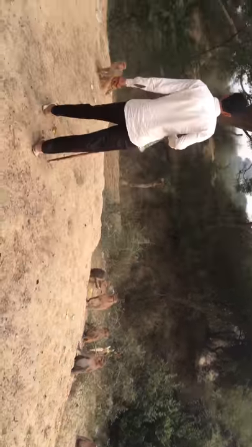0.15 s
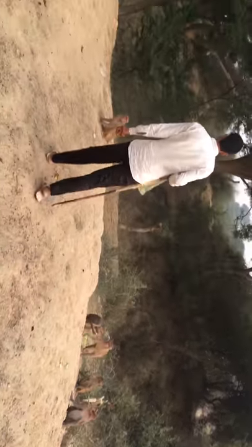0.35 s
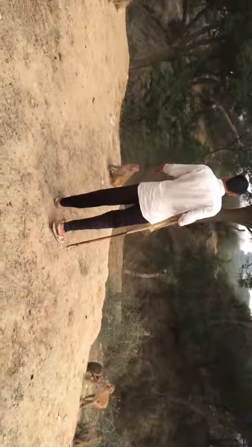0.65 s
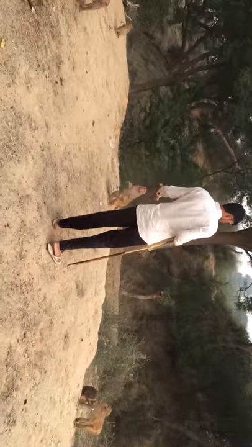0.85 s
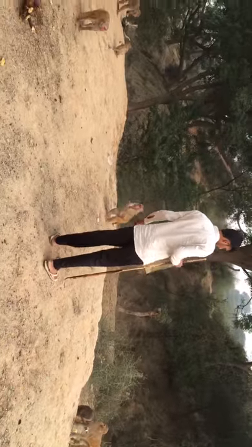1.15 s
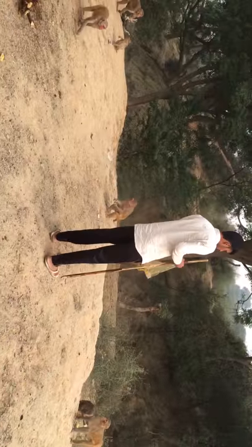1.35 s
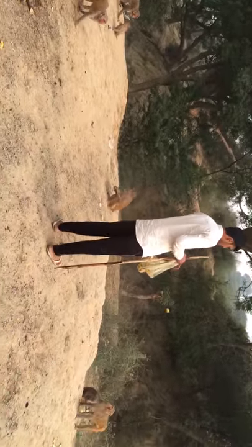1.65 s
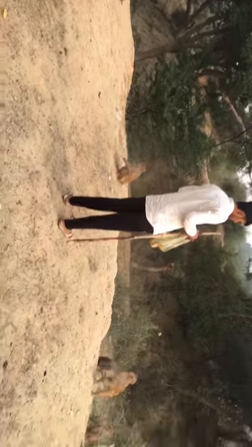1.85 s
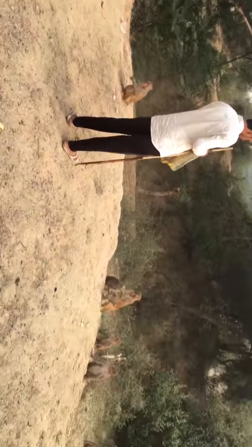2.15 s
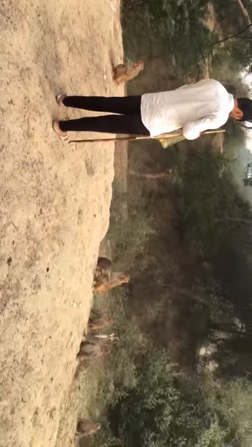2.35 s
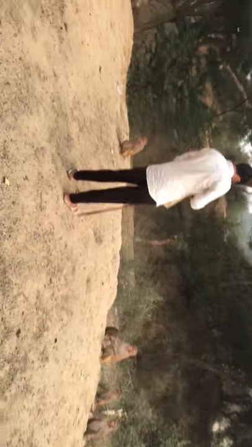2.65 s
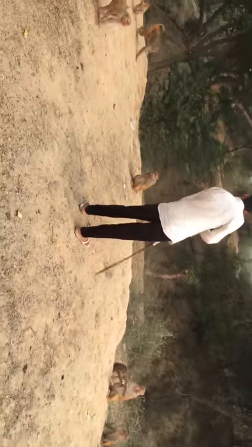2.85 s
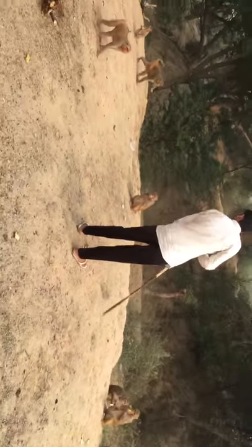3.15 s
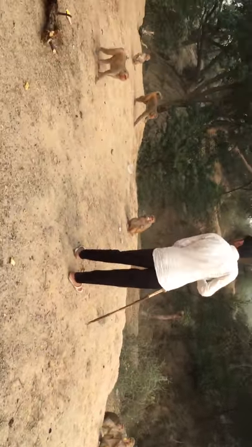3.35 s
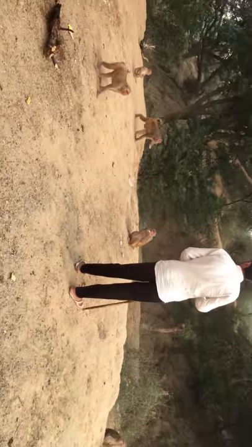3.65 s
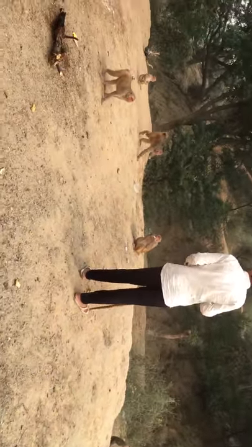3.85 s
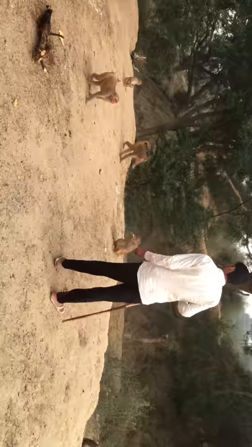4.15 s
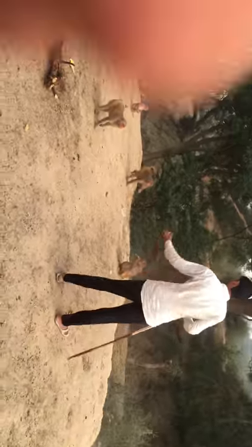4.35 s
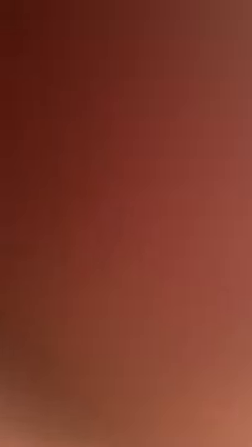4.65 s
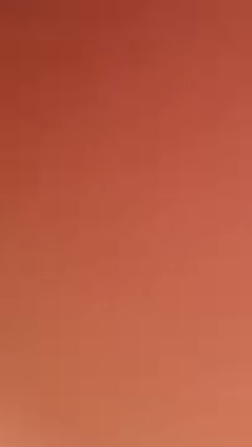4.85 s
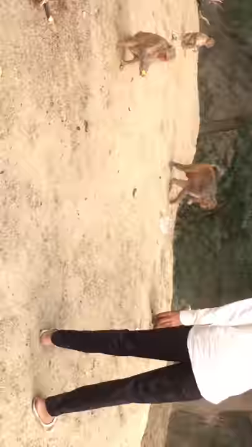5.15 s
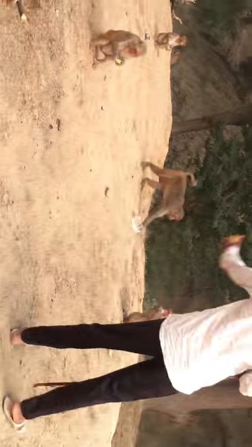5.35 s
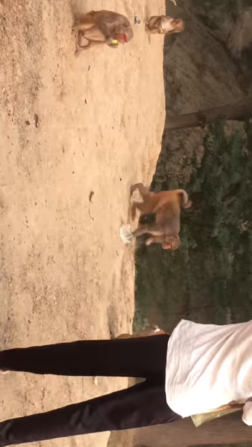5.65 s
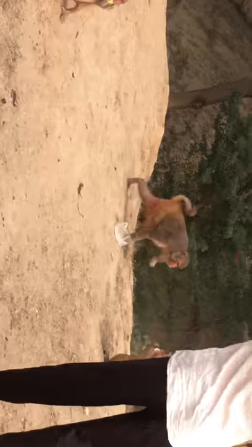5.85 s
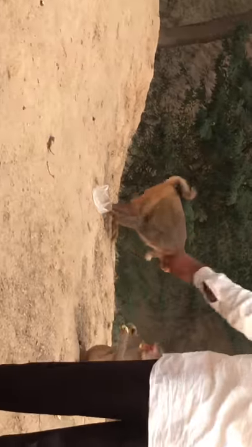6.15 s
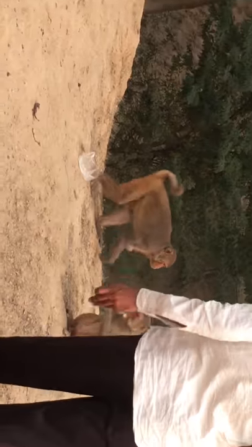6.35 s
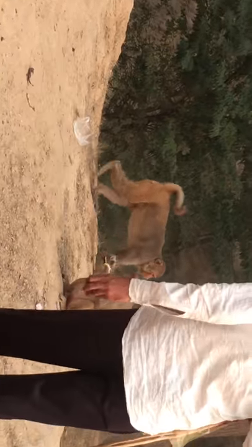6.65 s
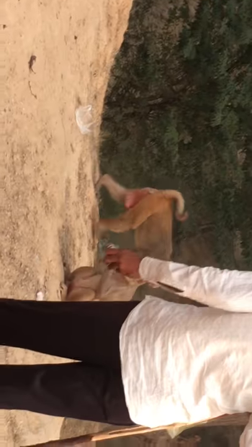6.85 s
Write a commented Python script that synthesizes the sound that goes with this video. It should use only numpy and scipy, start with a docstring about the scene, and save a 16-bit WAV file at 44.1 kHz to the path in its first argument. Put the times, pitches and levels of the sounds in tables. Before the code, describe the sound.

Monkeys coo, chirp, grunt and scream beside trees, with bag rustles and gritty ticks nearby and one low thump against the microphone late on.

```python
"""A troop of monkeys calls beside trees, over an airy hush and a low far rumble that run throughout.
Feet and a bag rustle and tick from the start, made of grainy noise and short rings, among soft gliding coos.
From 1.6 s hoarse screeches, low grunts and falling chirps join in, then four shrill screams from 2.5 s on.
Late, fingers tap the microphone case and a hand bumps it at 5.4 s. The calls are summed overtones plus
torn breath noise; calls, rustles and ticks echo faintly from the trees."""
import sys
import numpy as np
from scipy import signal
from scipy.fft import rfft, irfft
from scipy.io import wavfile
from scipy.ndimage import uniform_filter1d

SR = 44100
rng = np.random.default_rng(int(sys.argv[2]) if len(sys.argv) > 2 else 0)


def digitize_waveform(pressure):
    """Quantize a signal to 16-bit integers and store it at the path in sys.argv[1].

    Rows of a 2-D input are taken as channels; values are limited to [-1, 1].
    """
    field = np.atleast_2d(pressure).T
    bounded = np.clip(field, -1, 1)
    quanta = np.round(bounded * 32767).astype(np.int16)
    wavfile.write(sys.argv[1], SR, quanta)


N = 308170


def gain_of(db):
    """Amplitude factor of a level in dB."""
    return 10 ** (np.asarray(db) / 20)


def evened(x):
    """Scales a sound to an RMS of 1."""
    return x / np.sqrt(np.mean(x ** 2) + 1e-20)


def read(points, hz):
    """Reads a curve of (Hz, value) points on a logarithmic frequency axis."""
    f, value = np.transpose(points)
    return np.interp(np.log(hz + 1), np.log(f + 1), value)


def add(mix, s, sound):
    """Lays a sound into the mix at s seconds, trimming what falls outside."""
    sound = sound[max(-round(s * SR), 0):]
    part = mix[max(round(s * SR), 0):][:len(sound)]
    part += sound[:len(part)]


def coloured(x, db_at):
    """Filters x by a gain in dB given as a function of frequency."""
    hz = np.fft.rfftfreq(len(x), 1 / SR)
    return irfft(rfft(x) * gain_of(db_at(hz)), len(x))


def wander(count, s):
    """Slow chance with an RMS of 1 that changes about every s seconds."""
    size = max(round(s * SR), 1)
    noise = rng.standard_normal(count)
    return evened(uniform_filter1d(uniform_filter1d(noise, size), size))


# Spectrum shared by the hush and the rumble. Each row: frequency in Hz, relative density in dB per Hz.
AIR_COLOUR = [(15, -52), (25, -2.5), (43, -0.5), (64, -3.5), (130, -10), (223, -25.5), (531, -32.5),
              (1040, -32.5), (1330, -31.5), (3430, -38.5), (4870, -42.5), (6050, -41), (10400, -45),
              (12200, -47), (16000, -52)]
# Swells of the far rumble. Each row: time in seconds, level in dB.
RUMBLE_SWELLS = [(0, -46.5), (1.4, -50), (3, -49.5), (4.1, -49), (4.6, -50.5), (5.1, -48.5), (5.45, -43.5),
                 (5.75, -52), (6.1, -44), (6.5, -44.5), (6.99, -45.5)]
HUSH_DB = -62.5


def air():
    """Outdoor hush; below it a far rumble swells around one wavering low tone."""
    t = np.arange(N) / SR
    without_bass = lambda f: read(AIR_COLOUR, f) - 20 / (1 + (f / 100) ** 4)
    only_bass = lambda f: read(AIR_COLOUR, f) - 40 / (1 + (160 / (f + 1)) ** 6)
    hush = gain_of(HUSH_DB) * evened(coloured(rng.standard_normal(N), without_bass))
    hush = hush * gain_of(wander(N, .1))

    roar = evened(coloured(rng.standard_normal(N), only_bass))
    hum_hz = 49 * (1 + .08 * wander(N, .05))
    hum = np.sin(2 * np.pi * np.cumsum(hum_hz) / SR) * gain_of(.52 * wander(N, .043))
    rumble = evened(roar + gain_of(-2) * evened(hum))
    return hush + rumble * gain_of(np.interp(t, *np.transpose(RUMBLE_SWELLS)))


# Rustles of feet and bag. Each row: start in seconds, length in seconds, level in dB, centre in Hz,
# fall below the centre in dB per octave, fall above it in dB per octave.
RUSTLES = [(-.05, 0.19, -55.5, 3980, 0, 1.6), (0.092, .22, -58, 3120, 4, 8.5),
           (0.6, 0.059, -56.5, 3380, 9, 7.7), (0.731, 0.06, -46.5, 2400, 12, 8.2),
           (1.113, 0.016, -57, 2000, 10, 5), (1.641, 0.047, -55.5, 2500, 2.5, 18),
           (1.906, .11, -61, 1500, 21, 8), (1.978, .16, -56.5, 2270, 6, 13.4),
           (2.119, 0.18, -62.5, 7900, 0, 4.7), (2.239, 0.16, -57, 1950, 1, 6.4),
           (2.421, 0.1, -63.5, 2500, 3, 7.5), (2.831, 0.27, -51.5, 1630, 12, 13),
           (3.074, .16, -51.5, 1670, 6.5, 12.2), (3.79, 0.2, -53, 1370, 0.5, 8.6),
           (4.356, .039, -45.5, 2540, 3, 9.5), (4.506, 0.043, -51.5, 903, 0, 6.5),
           (4.577, .066, -51.5, 2650, 4, 11), (4.987, 0.046, -52, 200, 4, 13),
           (5.057, .13, -48, 200, 5, 5.8), (5.604, 0.21, -61, 3760, 2, 13),
           (5.9, 0.11, -60.5, 1210, 21, 12), (6.675, 0.026, -56.5, 3030, 12, 13)]


def rustles():
    """Clumped crackle: noise in uneven grains around a broad peak."""
    out = np.zeros(N)
    for s, length, db, hz, below_db, above_db in RUSTLES:
        count = round(length * SR)
        fine, clumps = 2.47 * wander(count, .00066), 2.84 * wander(count, .02)  # dB
        grains = rng.standard_normal(count) * gain_of(fine + clumps)
        octaves = lambda f: np.log2((f + 30) / hz)
        sound = coloured(grains, lambda f: np.minimum(below_db * octaves(f), -above_db * octaves(f)))
        add(out, s, gain_of(db) * evened(sound) * signal.windows.tukey(count, .4))
    return out


def torn(x, patchy_db):
    """Breaks noise into short narrow streaks, as folds that catch a pitch for a moment."""
    z = signal.stft(x, nperseg=256, noverlap=192)[2]
    patches = rng.standard_normal(z.shape)
    patches = uniform_filter1d(patches, 2, 0)  # narrow in frequency
    patches = uniform_filter1d(patches, 14, 1)  # drawn out in time
    streaks = z * gain_of(patchy_db * evened(patches))
    return evened(signal.istft(streaks, nperseg=256, noverlap=192)[1][:len(x)])


def call(rows, mouth, rasp, jitter, shimmer_db, breath_db, half_db):
    """Overtones of vocal folds and half lines shaped by the mouth, plus breath; hoarseness unsettles them."""
    # rows of controls: time s, pitch Hz, level dB, overtone tilt dB per octave, hoarseness 0-1
    s, *columns = np.transpose(rows)
    t = np.arange(s[0], s[-1], 1 / SR)
    hz, level_db, tilt_db, hoarse = (np.interp(t, s, c) for c in columns)
    hoarse = np.clip(hoarse, .02, .98)
    shake = wander(len(t), .00122) + 1.135 * wander(len(t), .00758)
    hz = hz * (1 + jitter * hoarse * shake)

    order = np.arange(1, 21)[:, None] / 2
    half = gain_of(half_db) * hoarse ** 2  # hoarse folds skip every other cycle
    size = gain_of(read(mouth, order * hz) + tilt_db * np.log2(order))
    size = size * np.where(order % 1 > 0, half, 1)
    size = size * (order * hz < 16000)
    size = size / np.sqrt((size ** 2).sum(0) / 2)  # steady power whatever the pitch

    flutter = np.array([wander(len(t), .029) for _ in order])  # each overtone comes and goes by itself
    flutter_db = 2.2 * np.log2(1 + order) * np.sqrt(hoarse) * flutter
    size = size * gain_of(flutter_db - 2 * hoarse * order)  # hoarseness also weakens the high overtones
    tone = (size * np.sin(2 * np.pi * order * np.cumsum(hz) / SR)).sum(0)
    tone = tone * gain_of(shimmer_db * np.sqrt(hoarse) * wander(len(t), .0036))

    breath = coloured(rng.standard_normal(len(t)), lambda f: read(rasp, f))
    breath = torn(breath, patchy_db=6)
    breath = breath * gain_of(2.3 * wander(len(t), .012))  # coarse bursts
    sound = np.sqrt(1 - hoarse ** 2) * tone + gain_of(breath_db) * hoarse ** 2 * breath
    fades = signal.windows.tukey(len(t), min(.026 / (s[-1] - s[0]), 1))  # 13 ms at each end
    return s[0], gain_of(level_db) * sound * fades


# Coos bend smoothly in pitch. Each row: start in seconds, length in seconds, start pitch in Hz, turning pitch
# in Hz, end pitch in Hz, level in dB, change by the end in dB, tilt of the overtones at the start and
# at the end in dB per octave.
COOS = [(0, .26, 715, 710, 740, -49, -9, -28, -26), (.23, .105, 1335, 1260, 1165, -60, -2, -1.5, -1.5),
        (.53, .07, 1375, 1310, 1240, -70, 0, -8, -8), (.722, .243, 518, 547, 505, -42, -16, -30, -9),
        (1.055, .615, 870, 1000, 865, -55, -2, -26, -16), (2.42, .06, 1270, 1230, 1190, -62, -6, -7, -7),
        (2.63, .23, 840, 778, 805, -65, 2, -10, -10), (3.97, .23, 1535, 1530, 1490, -59, -6, -16, -18),
        (5.81, .09, 1400, 1340, 1270, -52, -10, -15, -18)]
# How a coo leaves the mouth. Each row: frequency in Hz, gain in dB.
COO_MOUTH = [(500, 0), (1000, -3), (1500, -3), (2200, 6), (3000, 13), (3700, 15), (4400, 10), (6000, 8),
             (7500, 5), (9000, 17), (10500, 0), (14000, 0)]
# Colour of the breath in coos, screeches and chirps. Each row: frequency in Hz, gain in dB.
CALL_RASP = [(700, -21), (1500, -7), (2600, -2), (3300, 6), (4400, 0), (5200, -8), (6500, -9.5),
             (9200, -15), (10500, -18.5), (15000, -47)]
COO_TURN_AT, COO_SWELL_DB, COO_HOARSE = .46, -4, .14  # share of length; soft start; 0-1


def coo(s, length, start_hz, turn_hz, end_hz, db, fade_db, tilt_db, end_tilt_db):
    """Controls of a coo: pitch bends over, level swells in and then drifts, the overtone tilt glides."""
    u = np.linspace(0, 1, num=24)
    side = np.interp(u, [0, COO_TURN_AT, 1], [-1, 0, 1])
    hz = turn_hz + (np.where(side < 0, start_hz, end_hz) - turn_hz) * side ** 2
    soft_start_db = COO_SWELL_DB * (1 - u) ** 3 * (s > 0)  # a coo at time 0 is already under way
    level_db = db + soft_start_db + fade_db * u ** 2
    tilt = tilt_db + (end_tilt_db - tilt_db) * u
    return np.transpose([s + u * length, hz, level_db, tilt, COO_HOARSE + 0 * u])


def coos():
    """Soft, nearly clear voices with little breath."""
    out = np.zeros(N)
    for row in COOS:
        add(out, *call(coo(*row), COO_MOUTH, CALL_RASP, jitter=.015, shimmer_db=5, breath_db=-30, half_db=-32))
    return out


def knocks(rows, cycles, share, share_per_db):
    """Each knock is a quickly dying ring with a short crack of noise on top."""
    out, t = np.zeros(N), np.arange(900) / SR
    for s, db, hz in rows:
        ring = np.sin(2 * np.pi * hz * t) * np.exp(-hz * t / (2 * cycles))
        noise = rng.standard_normal(len(t))
        dull = evened(signal.lfilter([1, .4], [1, -.4], noise))
        crack = np.clip(share + share_per_db * (db + 40), 0, 1)
        add(out, s, gain_of(db) * ((1 - crack) * ring + crack * dull * np.exp(-t / .001)))
    return out


# Ticks of grit and bag. Each row: start in seconds, level in dB, ring in Hz.
TICKS = [(.1115, -38, 2770), (.633, -44, 1510), (.7506, -30, 2170), (.7783, -41, 2160), (.851, -41.5, 3120),
         (1.2137, -56, 4500), (1.283, -47, 2500), (1.5025, -48, 4000), (2.1002, -41, 1430),
         (2.1297, -38, 1500), (2.3073, -38.5, 1520), (2.325, -29, 2400), (2.4005, -42.5, 1340),
         (2.5844, -43, 1360), (2.7286, -37.5, 1420), (2.8484, -33.5, 1410), (3.0968, -29, 1430),
         (3.1394, -48, 1630), (3.1596, -29.5, 1840), (3.1687, -33, 1370), (3.1964, -32, 1520),
         (3.2275, -20, 1720), (3.249, -30, 1690), (3.2575, -32, 2500), (4.8205, -35, 2430),
         (4.8444, -39, 2320), (4.8875, -39, 2230), (5.0433, -31.5, 2770), (5.3496, -32, 2080),
         (6.8893, -36.5, 1830)]


def ticks():
    """Small bright knocks; the fainter the tick, the more crack and the less ring."""
    # ring energy falls by e in 1.18 cycles; the crack takes a share of .17 at -40 dB
    return knocks(TICKS, cycles=1.18, share=.17, share_per_db=-.025)


# Hoarse screeches on one pitch. Each row: start in seconds, length in seconds, pitch in Hz, level in dB,
# change by the end in dB.
SCREECHES = [(1.635, .17, 1633, -47, -3.5), (2.869, 0.2, 1934, -47.5, 3), (3.556, .07, 1800, -56, 6),
             (3.78, 0.19, 1690, -49, 8.5), (4.894, 0.071, 1720, -47, 7), (5.772, 0.11, 1400, -53, -3),
             (6.053, 0.041, 1492, -41, 5), (6.419, .16, 2004, -42, -6), (6.73, .17, 1910, -46.5, -1)]
# How screeches and chirps leave the mouth. Each row: frequency in Hz, gain in dB.
CHIRP_MOUTH = [(800, -16), (1200, -8), (1800, -7), (2500, -8), (3200, 2), (4200, 1), (5200, -13),
               (6500, -26), (9000, -27), (10500, -38), (15000, -48)]
SCREECH_SWELL_S, SCREECH_SWELL_DB = .058, -4.5
SCREECH_HOARSE, SCREECH_TILT_DB = .82, 0  # 0-1; dB per octave


def screech(s, length, hz, db, change_db):
    """Controls of a screech: held pitch, very hoarse, swelling in."""
    shape = [(0, SCREECH_SWELL_DB), (min(SCREECH_SWELL_S, length / 2), 0), (length, change_db)]
    return [(s + t, hz, db + d, SCREECH_TILT_DB, SCREECH_HOARSE) for t, d in shape]


def rough_call(rows):
    """A shaky voice with strong half lines and breath, shared by screeches and chirps."""
    return call(rows, CHIRP_MOUTH, CALL_RASP, jitter=.055, shimmer_db=3.5, breath_db=-.5, half_db=-6)


def screeches():
    """Rasping calls held on one pitch."""
    out = np.zeros(N)
    for row in SCREECHES:
        add(out, *rough_call(screech(*row)))
    return out


# Grunts. Each row: start in seconds, length in seconds, level in dB, pitch in Hz.
GRUNTS = [(1.642, 0.085, -49, 175.8), (1.898, 0.09, -51, 161.6), (3.794, 0.093, -51.5, 157.4),
          (4.11, 0.084, -54.5, 156), (4.54, 0.074, -55.5, 151)]
# Strength of each overtone of a grunt in dB, from the fundamental up.
GRUNT_OVERTONES = [6.5, -9.5, -95, -8.5, -26, -35]


def grunts():
    """Short low tones of a few overtones, unsteady in pitch and level."""
    out = np.zeros(N)
    for s, length, db, hz in GRUNTS:
        t = np.arange(0, length, 1 / SR)
        turns = np.cumsum(hz * (1 + .107 * wander(len(t), .0105))) / SR
        tone = sum(gain_of(d) * np.sin(2 * np.pi * k * turns) for k, d in enumerate(GRUNT_OVERTONES, 1))
        level = gain_of(db + 1.7 * wander(len(t), .0048))
        add(out, s, level * evened(tone) * np.hanning(len(t)) ** .15)
    return out


# Chirps glide to a top pitch, then slide away. Each row: start in seconds, rise in seconds, fall in seconds,
# start pitch in Hz, top pitch in Hz, end pitch in Hz, level in dB, hoarseness from 0 to 1.
CHIRPS = [(1.66, .04, 0.038, 1558, 1816, 1528, -35, .52),
          (1.725, 0.0044, 0.069, 1400, 1394, 1332, -42, .35),
          (2.881, 0.034, 0.041, 1970, 2533, 2490, -44.5, 0.58),
          (2.96, 0.027, 0.074, 1332, 2415, 2510, -43, .55),
          (3.22, 0.032, 0.09, 2454, 2620, 1650, -39, 0.47),
          (3.575, 0.036, 0.08, 1870, 2113, 1557, -39.5, .7),
          (3.693, 0.0057, 0.024, 1840, 1905, 1583, -41, 0.71),
          (3.714, .015, 0.046, 2595, 2564, 1687, -39.5, .6),
          (3.965, .015, .075, 2060, 2046, 1489, -42, 0.44),
          (4.385, 0.022, 0.069, 1803, 2357, 1518, -38.5, 0.53),
          (4.605, 0.034, 0.086, 2087, 2390, 1455, -40, .4),
          (4.949, 0.0071, 0.12, 1610, 1600, 1530, -41, 0.44),
          (5.09, 0.033, 0.079, 1600, 2486, 1500, -37, 0.54), (5.35, .035, .09, 1900, 2470, 1444, -38, 0.52),
          (6.071, 0.035, 0.024, 1050, 2400, 2130, -40, .6),
          (6.122, 0.0058, 0.07, 1735, 1781, 1249, -35.5, 0.72),
          (6.325, 0.046, .065, 1150, 1950, 1414, -37, .6),
          (6.46, 0.0046, 0.054, 2010, 1980, 2016, -43, 0.35),
          (6.499, 0.0049, 0.044, 2770, 2700, 1720, -40.5, 0.48),
          (6.684, 0.039, 0.082, 2536, 2683, 1550, -40, 0.58),
          (6.779, 0.023, .025, 2270, 2448, 2310, -37.5, 0.39),
          (6.821, 0.0042, 0.067, 1960, 1936, 1762, -37, 0.58)]
START_DB, TOP_DB, END_DB = -8.5, -5.5, -4  # against the loudest moment
LOUDEST_AT = .64  # share of the slide
SLIDE_TURN = .85  # 0-1: how far the slide levels out again at its end
SLIDE_HURRY = .75  # below 1 the slide leaves the top early
CLEARS_BY = .1  # share of the hoarseness lost halfway down the slide
CHIRP_TILT_DB = -2  # per octave


def chirp(s, rise, fall, start_hz, top_hz, end_hz, db, hoarse):
    """Controls of a chirp: a quick rounded rise, then a slide that is loudest past its middle."""
    v = np.linspace(-1, 1, num=21)  # 0 at the top
    down, turn = np.maximum(v, 0), np.pi * SLIDE_TURN
    slide = (1 - np.cos(turn * down ** SLIDE_HURRY)) / (1 - np.cos(turn))
    hz = top_hz + np.where(v < 0, (start_hz - top_hz) * v ** 2, (end_hz - top_hz) * slide)
    level_db = db + np.interp(v, [-1, 0, LOUDEST_AT, 1], [START_DB, TOP_DB, 0, END_DB])
    t = s + rise + v * np.where(v < 0, rise, fall)
    roughness = hoarse * (1 - CLEARS_BY * np.sin(np.pi * down))
    return np.transpose([t, hz, level_db, CHIRP_TILT_DB + 0 * v, roughness])


def chirps():
    """Brief rough calls, most of them falling."""
    out = np.zeros(N)
    for row in CHIRPS:
        add(out, *rough_call(chirp(*row)))
    return out


# One list of points for each scream. Each row: time in seconds, pitch in Hz, level in dB.
SCREAMS = [
    [(2.53, 6400, -78), (2.59, 7000, -62)],
    [(2.62, 4430, -52), (2.645, 3920, -45.5), (2.67, 4420, -51.5), (2.76, 4710, -49), (2.79, 4110, -46.5),
     (2.83, 3584, -41.5), (2.845, 2900, -39)],
    [(4.06, 3560, -62), (4.08, 3985, -50), (4.16, 4340, -48.5), (4.19, 4146, -47), (4.21, 4200, -52),
     (4.25, 3824, -47), (4.3, 3764, -45), (4.38, 3580, -46), (4.415, 2803, -43)],
    [(5.73, 1304, -67), (5.79, 2337, -46), (5.825, 3420, -42.5), (5.86, 4260, -45), (5.92, 4595, -54.5),
     (5.96, 4540, -51.5), (6.0, 4490, -51.5), (6.065, 3660, -41), (6.082, 3225, -64)],
]
# How a scream leaves the mouth. Each row: frequency in Hz, gain in dB.
SCREAM_MOUTH = [(1500, -6), (3000, 9.5), (4300, 4.5), (6000, -4.5), (8500, 0.5), (11000, -6), (13000, -7),
                (15500, -19)]
# Colour of the breath in a scream. Each row: frequency in Hz, gain in dB.
SCREAM_RASP = [(1000, 11), (2500, 17), (4300, 3), (6000, 21), (8500, 5), (11000, 19.5), (13000, -28),
               (15500, -34)]
SCREAM_PEAK_HZ = 4600  # overtones are strongest and the voice clearest near this pitch
SCREAM_TILT_DB, TILT_LOSS_DB = 4.5, 7  # dB per octave at the peak; loss for each octave off it
SCREAM_HOARSE, HOARSE_PER_OCTAVE = .27, .15  # at the peak; gain for each octave off it


def scream(points):
    """Controls of a scream: brightest and clearest near its peak pitch."""
    rows = []
    for s, hz, db in points:
        off = abs(np.log2(hz / SCREAM_PEAK_HZ))
        rows.append((s, hz, db, SCREAM_TILT_DB - TILT_LOSS_DB * off, SCREAM_HOARSE + HOARSE_PER_OCTAVE * off))
    return rows


def screams():
    """Shrill voices that sweep through high pitches."""
    out = np.zeros(N)
    for points in SCREAMS:
        add(out, *call(scream(points), SCREAM_MOUTH, SCREAM_RASP, jitter=.02, shimmer_db=5, breath_db=5, half_db=8))
    return out


# Finger taps on the case. Each row: start in seconds, level in dB, ring in Hz.
TAPS = [(4.363, -41, 633), (4.517, -35, 486), (4.594, -40.5, 263), (4.812, -36, 526), (4.864, -38, 417),
        (4.993, -36, 240), (5.17, -47, 484), (5.353, -35.5, 276), (5.501, -44, 320), (5.642, -36, 440),
        (5.699, -38.5, 513), (6.478, -44, 295)]


def taps():
    """Dull low knocks that hardly ring, with a little crack."""
    return knocks(TAPS, cycles=.33, share=.1, share_per_db=0)


# One bump of the case: start in seconds, level in dB, start pitch in Hz, end pitch in Hz, swing time in seconds.
BUMP = (5.357, -14.4, 110, 45, .0055)


def bump():
    """A hand knocks the case: a low swing that swells, sinks in pitch and dies."""
    s, db, start_hz, end_hz, swing = BUMP
    out, t = np.zeros(N), np.arange(0, .08, 1 / SR)
    hz = end_hz + (start_hz - end_hz) * np.exp(-t / (3 * swing))
    swell = (t / swing) ** 2 * np.exp(-t / swing)
    add(out, s, -gain_of(db) * swell * np.sin(2 * np.pi * np.cumsum(hz) / SR))
    return out


# How long the trees echo. Each row: frequency in Hz, time to fall by 60 dB in seconds.
TREE_ECHO = [(500, 0.16), (1500, 0.24), (3500, 0.62), (6000, 0.37), (9000, 0.42), (12000, 0.21)]


def trees(x):
    """Sparse echoes of random sign, each band dying at its own speed."""
    echoes = np.zeros(SR)
    at = np.arange(300, SR - 20, 20)  # samples: one echo in every 20
    echoes[at + rng.integers(0, 20, len(at))] = rng.choice([-1., 1.], len(at))
    hz, t, z = signal.stft(echoes, SR, nperseg=256)
    decay = gain_of(-60 * t / read(TREE_ECHO, hz)[:, None])
    tail = signal.istft(z * decay, SR, nperseg=256)[1]
    return signal.fftconvolve(x, tail / np.linalg.norm(tail))[:N]


def scene():
    """Calls, rustles and ticks echo from the trees; taps, bump and air stay dry."""
    near = rustles() + ticks()
    troop = coos() + screeches() + grunts() + chirps() + screams()
    echo = trees(gain_of(-7.5) * troop + gain_of(-14.5) * near)
    return (air() + near + troop + echo + taps() + bump())[None]


# Dips of the microphone case. Each row: centre in Hz, width in Hz, depth in dB.
MIC_DIPS = [(4900, 300, -4), (10500, 700, -6)]
EDGE_HZ = 15780  # upper band limit


def record(dry):
    """Microphone: steep bass cut and two dips of the case; then the band limit."""
    dips = lambda f: sum(db / (1 + (2 * (f - hz) / width) ** 2) for hz, width, db in MIC_DIPS)
    bass = lambda f: -25 / (1 + (f / 33) ** 10)
    heard = coloured(dry[0], lambda f: dips(f) + bass(f))[None]
    band_limit = signal.firwin(1023, EDGE_HZ, window=("kaiser", 10), fs=SR)
    return signal.oaconvolve(heard, band_limit[None], "same")


dry = scene()
out = record(dry)
digitize_waveform(out)
```